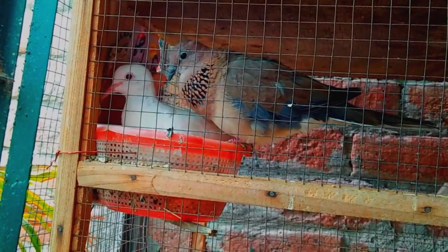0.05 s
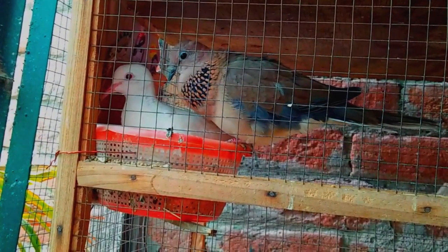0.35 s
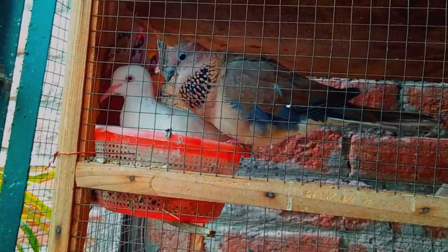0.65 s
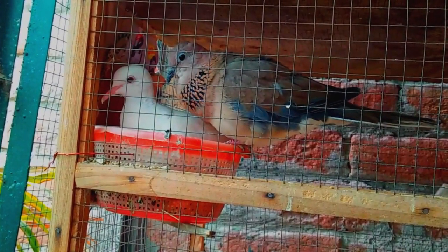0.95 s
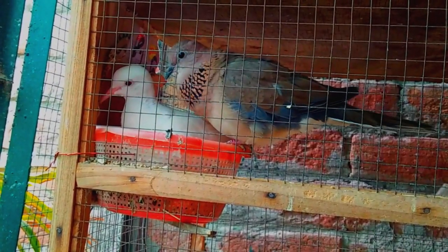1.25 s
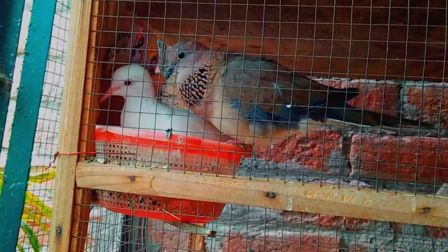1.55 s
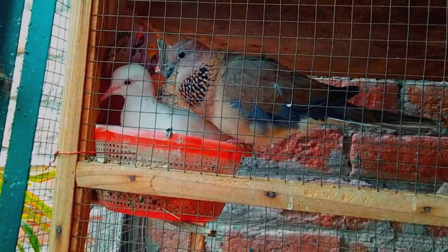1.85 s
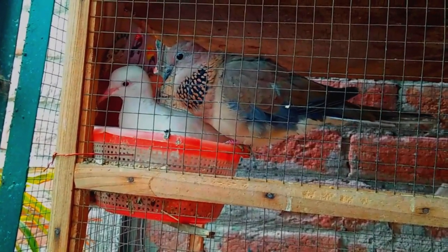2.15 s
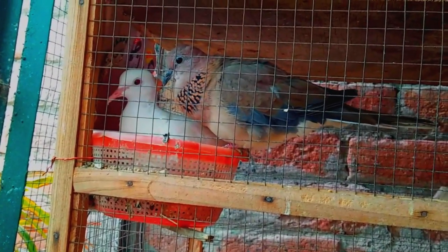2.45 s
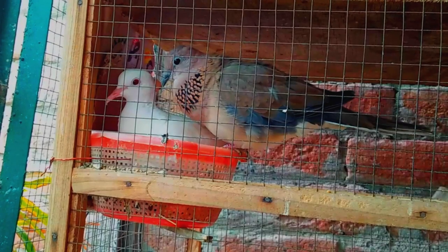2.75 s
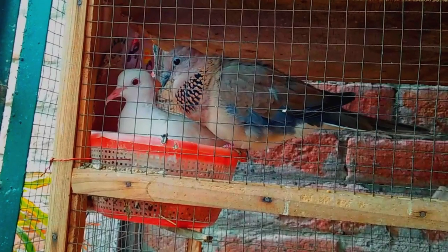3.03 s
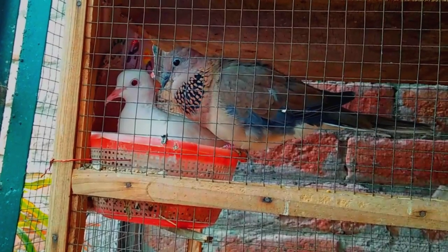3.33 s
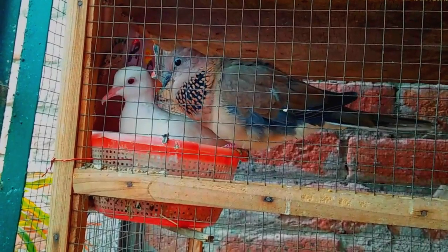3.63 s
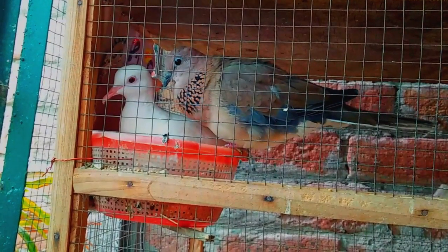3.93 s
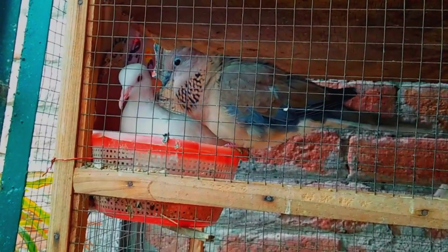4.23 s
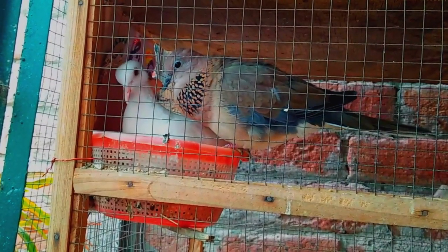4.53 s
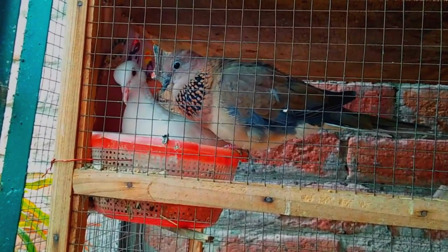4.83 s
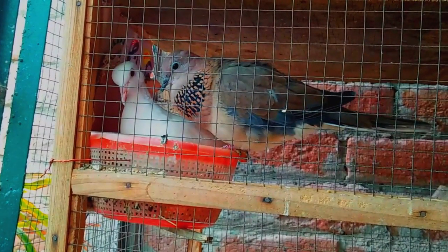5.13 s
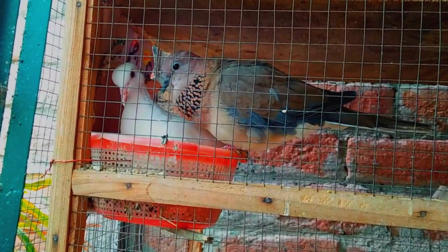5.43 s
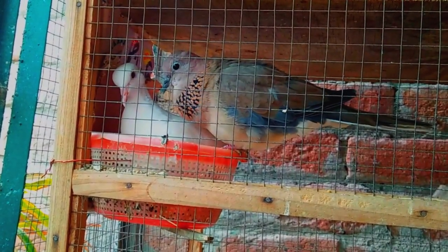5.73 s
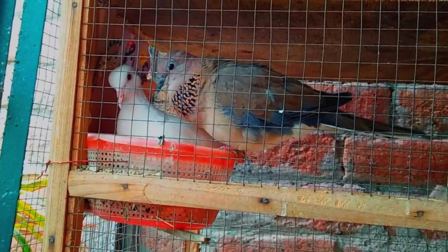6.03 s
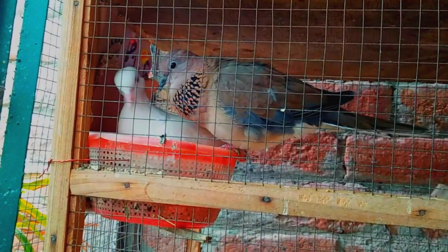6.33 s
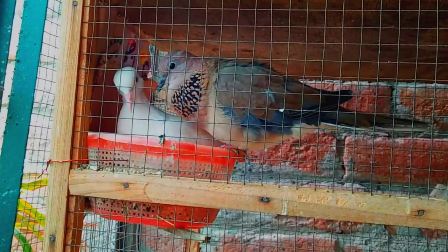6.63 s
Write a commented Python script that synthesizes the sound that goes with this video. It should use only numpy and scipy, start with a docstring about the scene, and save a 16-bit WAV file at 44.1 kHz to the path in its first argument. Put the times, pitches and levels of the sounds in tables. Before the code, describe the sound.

A dove coos close by about every second and a half, its mellow hoots mostly sinking into a little sigh, with quiet chuckles from another dove. Sharp, raspy parrot squawks cut in over continuous distant chirping, and a cluster of small wire mesh ticks comes toward the end. Wood and brick lightly reflect the calls in the aviary, with faint outdoor noise underneath.

```python
"""Over outdoor rumble and thin hiss, a dove in a wooden nest box grunts and starts the first of five
phrases: a murmur, then hooting coos, its swollen throat passing little but the fundamental. Far parrots
twitter, claws tick on wire mesh, and a near parrot's syrinx whistles and rasps. The phrase sinks to a
sigh and a second dove chuckles back. The screeches are loudest near 2 s and 4 s, the ticks near 6 s.
Throughout, the boards and bricks of the aviary reflect the calls."""
import sys
import numpy as np
from scipy import signal
from scipy.fft import rfft, irfft, next_fast_len
from scipy.io import wavfile
from scipy.ndimage import uniform_filter1d, minimum_filter1d

SR = 44100
rng = np.random.default_rng(int(sys.argv[2]) if len(sys.argv) > 2 else 0)


def inscribe(sig):
    """Save sig as 16-bit PCM at rate SR to the path in sys.argv[1].

    A 1-D sig is mono; a 2-D sig holds one channel per row.
    Samples are clipped to [-1, 1] before scaling.
    """
    pcm = np.round(np.clip(np.atleast_2d(sig).T, -1, 1) * 32767)
    wavfile.write(sys.argv[1], SR, pcm.astype(np.int16))


N = 298548
TIME = np.arange(N) / SR

# Levels are relative, ahead of the mix.
# Spectrum of the outdoor rumble: f/Hz, level/dB
RUMBLE_SPECTRUM = [(20, -21), (32, -23), (45, 5.5), (70, 0.5), (120, -5), (200, -13), (330, -22),
                   (700, -31.5), (2000, -86)]
# Spectrum of the hiss: f/Hz, level/dB
HISS_SPECTRUM = [(200, -5), (350, -8), (600, 2), (1000, 4), (1500, -5), (2500, 11), (3300, -5.5),
                 (4000, -13), (5500, -1), (7000, 4), (8500, -5.5), (11000, -3), (14500, -10)]
# Envelope of the hiss: t/s, level/dB
HISS_SWELL = [(0, -59), (.12, -72), (.2, -50.5), (.7, -63), (1.3, -46.5), (2.2, -52), (2.9, -55),
              (3.3, -56), (4.1, -44.5), (4.3, -64), (4.5, -48.5), (4.8, -57), (5.3, -55.5), (6.2, -45.5),
              (6.4, -56), (6.7, -54.5)]
# Throaty dove notes: t/s, duration/s, top f/Hz, level/dB
GRUNTS = [(0, 0.036, 412, -36), (0.655, 0.13, 479, -43.5), (0.874, 0.081, 483.7, -34.5),
          (1.341, 0.046, 420, -37.5), (1.658, 0.11, 519, -45), (2.81, 0.08, 415, -38),
          (4.348, 0.091, 411.3, -38), (5.809, 0.048, 472.6, -39), (5.98, 0.058, 402, -38)]
# Opening notes of the phrases: t/s, duration/s, level/dB
MURMURS = [(0.026, 0.15, -33.5), (1.547, 0.17, -30), (3.037, .15, -30.5), (4.559, 0.17, -28.5),
           (6.184, .16, -30.5)]
# Distant chirps: t/s, duration/s, start f/Hz, end f/Hz, level/dB
TWITTERS = [(0.145, 0.033, 2774, 2940, -39.5), (0.221, 0.04, 2633, 2325, -36),
            (0.276, 0.065, 2740, 2927, -39), (0.749, 0.061, 2290, 2097, -36.5),
            (.839, .13, 3190, 2154, -36), (.84, 0.061, 6560, 5680, -44), (0.918, 0.079, 4460, 4000, -44),
            (1.009, 0.13, 2680, 3220, -35), (1.204, 0.074, 2450, 5630, -34.5),
            (1.25, 0.066, 6260, 6000, -35.5), (1.272, 0.11, 2820, 3960, -35.5),
            (1.344, 0.079, 4710, 4940, -28), (1.445, .13, 2410, 3450, -36),
            (1.52, 0.094, 3450, 4540, -33.5), (1.656, 0.11, 3110, 2235, -33.5),
            (1.735, 0.063, 4970, 4970, -35.5), (1.737, 0.18, 2672, 2507, -37),
            (1.911, .064, 1843, 2587, -27), (2.789, 0.071, 2920, 2120, -37),
            (3.579, 0.099, 2920, 2960, -42.5), (3.718, 0.075, 2820, 2670, -31.5),
            (4.271, 0.043, 2764, 2610, -35), (4.72, 0.036, 2880, 2485, -44), (4.864, .12, 2700, 2880, -47),
            (5.061, 0.11, 2958, 2493, -43), (5.223, 0.077, 3540, 3270, -46.5),
            (5.828, 0.11, 2636, 2760, -36), (6.155, 0.048, 2375, 2405, -35),
            (6.508, 0.094, 2603, 2183, -36)]
# Claws and beaks touching the mesh: t/s, level/dB
TICKS = [(.2024, -20), (.2242, -30.5), (3.157, -24), (3.535, -27.5), (4.6204, -20), (5.1374, -25.5),
         (5.2109, -25.5), (6.0987, -24), (6.1363, -18), (6.204, -13.5), (6.2497, -22), (6.3005, -25),
         (6.621, -27), (6.6743, -29)]
# Spectrum of the wire mesh: f/Hz, level/dB
MESH_SPECTRUM = [(1000, -14.5), (2500, -1.5), (4000, -9.5), (6500, 6), (9000, -0.5), (14000, -4)]
# Full coos: t/s, low lead/s, high hold/s, low tail/s, top f/Hz, level/dB
COOS = [(.28, 0.014, 0.092, 0.017, 750, -20.5), (.461, 0.0018, 0.037, .012, 761, -20),
        (.555, 0.0063, 0.043, .02, 774, -20.5), (1.808, 0.015, 0.046, 0.003, 740, -22),
        (1.896, 0.0048, .053, 0.011, 756.6, -20.5), (2.035, 0.0023, .046, 0.029, 765, -20),
        (3.292, 0.012, 0.077, 0.0063, 749.5, -21), (3.385, 0.027, 0.032, 0.014, 759, -20.5),
        (3.517, 0.0062, .055, 0.023, 763.6, -21), (4.818, 0.047, 0.057, 0.027, 751.6, -19.5),
        (5.064, 0.0059, 0.042, 0.022, 781, -20), (6.428, 0.083, 0.06, 0.012, 761.6, -20),
        (6.648, 0.0029, 0.041, 0.026, 765, -19.5)]
# Near parrot calls: t/s, duration/s, peak position/1, start f/Hz, end f/Hz, glide position/1,
# glide time/s, start roughness/1, end roughness/1, mid-band level/dB, bass/dB re mid, treble/dB re mid
SQUAWKS = [(0.394, 0.12, 0.72, 2188, 2702, 0.66, 0.014, 0, 0.33, -18, -11, -14),
           (1.953, 0.1, 0.89, 3220, 2966, 0.27, .008, .12, 0.72, -18.5, -4.5, -12.5),
           (2.112, .084, 0.6, 3478, 1768, .61, .0065, 0.08, 0.17, -12, 3, -4.5),
           (2.29, 0.097, 0.53, 2180, 2860, 0.56, 0.01, 0.06, 0.18, -22, -5, -16.5),
           (2.509, 0.22, 0.26, 2213, 2285, 0.53, 0.034, 0.14, 0, -29.5, -33, -11.5),
           (3.246, 0.064, 0.9, 2375, 2096, 0.16, 0.0074, 0.57, 0.45, -20.5, -14, -13),
           (3.373, 0.076, 0.73, 2478, 2620, 0.59, 0.011, 0.54, 0.22, -19.5, -10, -13.5),
           (3.763, 0.092, 0.72, 2750, 2850, 0.38, 0.014, 0.83, 0.17, -28, -3.5, -16),
           (3.882, 0.27, 0.62, 2093, 3408, .26, .036, 0.75, 0.71, -12.5, -0.5, -9.5),
           (4.376, .097, 0.48, 1880, 3454, 0.41, 0.0097, 0.3, 0.88, -28, -6, -12.5),
           (5.28, 0.085, 0.37, 2930, 3223, 0.02, 0.013, 0.55, 0.48, -20, -9, -12.5),
           (5.404, .08, 0.23, 2917, 2602, 0.61, 0.016, 0.68, 0.78, -23.5, -5, -15),
           (5.615, 0.099, .52, 2165, 3048, 0.47, 0.00412, 0.14, 0.42, -17, -9.5, -13.5)]
# Response of a wide-open beak: f/Hz, gain/dB
BEAK_RESPONSE = [(410, -75.5), (700, -28.5), (1120, -27), (1790, -6), (2460, 13), (2650, 6.5), (3420, 7),
                 (4400, -1.5), (4870, 1), (6780, -1), (8620, -3.5), (9660, -6), (11000, -19),
                 (14000, -13.5), (14500, -71)]
# Closing notes of the phrases: t/s, duration/s, start f/Hz, level/dB
SIGHS = [(0.663, 0.11, 640, -27), (2.153, 0.089, 632, -27.5), (3.64, .08, 634.4, -24.5),
         (5.188, 0.1095, 649, -23.5)]
# The second dove's answers: t/s, level/dB, hum duration/s
CHUCKLES = [(1.105, -31.5, 0.084), (1.295, -32, 0.075), (1.44, -33.5, 0.0035), (1.525, -35.5, 0.014),
            (1.595, -34, 0.0096), (1.735, -32.5, 0.0049), (3.02, -34, 0.0063), (4.54, -37, 0.011),
            (5.11, -29, 0.013), (5.235, -29.5, 0.0028), (5.373, -32, 0.074), (5.494, -32, 0.068),
            (5.613, -34, 0.072), (5.736, -36.5, 0.017)]
# Dull bumps in the rumble: t/s, duration/s, level/dB
BUMPS = [(2.1, 0.13, -52), (3.393, 0.05, -55), (3.535, 0.11, -59), (4.578, 0.079, -53),
         (5.132, 0.26, -54.5)]
# Reflections from the boards and bricks round the nest: delay/s, gain/dB
NEST_REFLECTIONS = [(.0052, -29.5), (.0141, -19), (.0275, -24)]
# Reverberation time of the aviary: f/Hz, T60/s
AVIARY_T60 = [(400, 0.78), (750, 0.39), (2500, 0.23), (6000, 0.18), (13000, 0.16)]


def amp(db):
    """Amplitude grows tenfold per 20 dB."""
    return 10 ** (np.asarray(db) / 20)


def unit(x):
    """Normalisation to unit RMS."""
    return x / np.sqrt(np.mean(x ** 2) + 1e-20)


def curve_at(points, hz):
    """Interpolation on a logarithmic frequency axis."""
    f, value = np.transpose(points)
    return np.interp(np.log(hz + 1), np.log(f + 1), value)


def add(mix, s, sound):
    """Superposition: a sound joins the mix at s seconds."""
    part = mix[max(round(s * SR), 0):][:len(sound)]
    part += sound[:len(part)]


def play(source, rows):
    """Superposition of one event per row."""
    out = np.zeros(N)
    for row in rows:
        add(out, *source(*row))
    return out


def colour(x, spectrum):
    """Filtering as multiplication of spectra."""
    size = next_fast_len(len(x) + 1024)
    gain = amp(curve_at(spectrum, np.fft.rfftfreq(size, 1 / SR)))
    return irfft(rfft(x, size) * gain, size)[:len(x)]


def band(x, hz, kind, order=4):
    """Butterworth filtering."""
    return signal.sosfilt(signal.butter(order, hz, kind, fs=SR, output="sos"), x)


def wobble(size, hz):
    """Low-passed noise as a random modulator."""
    return unit(band(rng.standard_normal(size + 2000), hz, "low", order=2)[-size:])


def phase_of(hz):
    """Phase is the integral of frequency."""
    return 2 * np.pi * np.cumsum(hz) / SR


def gate(t, attack, release):
    """Raised-cosine ramps open and close a note."""
    return np.sin(np.pi / 2 * np.clip(np.minimum(t / attack, (t[-1] - t) / release), 0, 1)) ** 2


def rumble(level_db=-64, lumps_db=2):
    """Random amplitude modulation makes deep outdoor noise lumpy."""
    noise = unit(colour(rng.standard_normal(N), RUMBLE_SPECTRUM))
    return amp(level_db + lumps_db * wobble(N, 35)) * noise


def hiss(flicker_db=2):
    """Amplitude modulation makes thin noise swell and flicker."""
    swell_db = np.interp(TIME, *np.transpose(HISS_SWELL)) + flicker_db * wobble(N, 26)
    return amp(swell_db) * unit(colour(rng.standard_normal(N), HISS_SPECTRUM))


def grunt(s, length, pitch_hz, level_db, harmonics_db=(-13, 0, -21)):
    """Resonance: the dove's throat favours the second harmonic of a low, arched note."""
    u = np.linspace(0, 1, round(length * SR))
    phase = phase_of(pitch_hz * (1 - .35 * (u - .5) ** 2 + .015 * wobble(len(u), 200)))
    tone = sum(amp(db) * np.sin(k * phase) for k, db in enumerate(harmonics_db, 1))
    flutter = np.exp(0.43 * wobble(len(u), 110))
    return s, amp(level_db) * unit(tone * flutter) * signal.windows.tukey(len(u), .35)


def throat(hz, level_db, attack=0.014, husky_hz=650, jitter=0.0082, shimmer=0.057, waver_db=1.05):
    """Source and filter: the swollen throat passes mainly the fundamental; low notes are huskier."""
    t = np.arange(len(hz)) / SR
    phase = phase_of(hz * (1 + jitter * wobble(len(t), 55)))
    husky = np.clip((husky_hz - hz) / 50, .05, 1) * amp(-26)
    overtones = sum(np.sin(k * phase) * (1 + .5 * wobble(len(t), 60)) for k in (1.5, 2, 3)) / 2
    tone = unit(np.sin(phase) + husky * overtones) * (1 + shimmer * wobble(len(t), 62))
    # the voice cracks at onsets and register breaks
    slew_hz_per_s = uniform_filter1d(abs(np.gradient(hz, t)), size=300)
    cracking = np.clip(slew_hz_per_s / 8000, 0, 1) ** 2 + np.exp(-t / 0.011)
    crack = amp(-17) * cracking * unit(band(rng.standard_normal(len(t)), [450, 1000], "band", order=3))
    envelope = amp(level_db + waver_db * wobble(len(t), 25)) * gate(t, attack, release=0.0057)
    return envelope * (tone + crack)


def murmur(s, length, level_db, start_hz=569, rise_hz=61.6, purr_hz=145, purr_depth=0.019, purr_db=1.73):
    """Joint frequency and amplitude modulation puts a purr on a swelling, rising note."""
    u = np.linspace(0, 1, round(length * SR))
    pulse = np.sin(phase_of(purr_hz * (1 + 0.068 * wobble(len(u), 44))))
    hz = (start_hz + rise_hz * u ** 2) * (1 + purr_depth * pulse)
    swell_db = np.interp(u, [0, 0.74, 1], [-9, 0, -4.5])
    return s, throat(hz, level_db + purr_db * pulse + swell_db)


def twitter(s, length, start_hz, end_hz, level_db, scratch=0.059, waver=0.0291, flutter=0.38):
    """Random frequency modulation of a far chirp: the fast part scratches, the slow part wavers."""
    size = round(length * SR)
    unsteady = scratch * rng.uniform(0.75, 1.636) * wobble(size, 675) + waver * wobble(size, 51.3)
    phase = phase_of(np.linspace(start_hz, end_hz, size) * (1 + unsteady))
    tone = (np.sin(phase) + amp(-24) * np.sin(2 * phase)) * np.exp(flutter * wobble(size, 80))
    return s, amp(level_db) * unit(tone) * signal.windows.tukey(size, .5)


def chatter(count=120):
    """Superposition of the flock's faint random chirps gives a running warble."""
    out = np.zeros(N)
    for k, (late, length, pitch, glide, soft) in enumerate(rng.random((count, 5))):
        s = (k + late) / count * TIME[-1]
        hz = 1400 + 1600 * pitch
        level_db = -42.5 - 9 * soft - 4 * (1 - pitch)
        add(out, *twitter(s, .02 + .05 * length, hz, hz * (.8 + .4 * glide), level_db, scratch=0.024))
    return out


def mesh_ticks(rise_s=0.0015, decay_s=0.012, gain_db=-11, scratch_count=45):
    """Damped vibration: each touch rattles the wire briefly; faint scratches fall in between."""
    out, t = np.zeros(N), np.arange(3000) / SR
    envelope = np.exp(-t / decay_s) * (1 - np.exp(-t / rise_s))
    scratches = [(when * TIME[-1], -35 - 10 * soft) for when, soft in rng.random((scratch_count, 2))]
    for s, level_db in list(TICKS) + scratches:
        rattle = unit(colour(rng.standard_normal(len(t)), MESH_SPECTRUM))
        add(out, s, amp(level_db + gain_db) * rattle * envelope)
    return out


def coo(s, lead, hold, tail, pitch_hz, level_db, break_s=0.0046, arch_db=7, hz_per_db=3, low_db=-6):
    """Register break: the voice jumps to a loud hoot, where pitch follows effort, then drops back."""
    t = np.arange(0, lead + hold + tail, 1 / SR)
    high = (np.tanh((t - lead) / break_s) - np.tanh((t - lead - hold) / break_s)) / 2
    effort_db = -arch_db * np.clip(2 * (t - lead) / hold - 1, -1, 1) ** 2
    low_hz = np.where(t < lead + hold / 2, 665, 631)
    hz = high * (pitch_hz + hz_per_db * effort_db) + (1 - high) * low_hz
    return s, throat(hz, level_db + high * effort_db + (1 - high) * low_db, attack=0.0095)


def syrinx(pitch_hz, rough, buzz_hz=330, buzz_depth=0.53, twin_ratio=1.072, twin_db=-17, smear_hz=440):
    """Nonlinear oscillation: returns a buzzing whistle and the rasp of its period doubling."""
    size = len(pitch_hz)
    shake = np.sin(phase_of(buzz_hz * (1 + 0.322 * wobble(size, 119.5))))
    jitter = (0.013 + .06 * rough) * (wobble(size, 600) + 0.66 * shake)
    phase = phase_of(pitch_hz * (1 + jitter + 0.0069 * wobble(size, 70)))
    twin = phase * twin_ratio  # the other side of the syrinx sings a little sharp
    odd = np.clip((pitch_hz - 2500) / 600, .08, 1)  # even harmonics carry the low calls
    whistle = sum(odd ** (k % 2) * (np.sin(k * phase) + amp(twin_db) * np.sin(k * twin))
                  for k in range(1, 7))
    rasp = 0
    for k in range(1, 11):  # a noise band round each half harmonic
        sine = wobble(size, smear_hz) * np.sin(k * phase / 2)
        cosine = wobble(size, smear_hz) * np.cos(k * phase / 2)
        rasp += 0.65 ** (k % 2) * (sine + cosine)
    croak = np.clip((3200 - pitch_hz) / 150, 0, 3.5) * rough  # the subharmonic swells as pitch sinks
    rasp += 2 * croak * wobble(size, 200) * np.sin(phase / 2)
    return whistle * (1 + buzz_depth * shake), rasp * np.exp(0.29 * wobble(size, 303))


def squawk(s, length, peak_at, start_hz, end_hz, glide_at, glide_s, rough_start, rough_end,
           level_db, bass_db, treble_db, attack_s=.018):
    """Source and filter: a parrot's syrinx slides between two pitches and its beak colours the sound."""
    t = np.arange(-attack_s / 2, length, 1 / SR)
    u = t / length
    pitch_hz = start_hz + (end_hz - start_hz) / (1 + np.exp((glide_at * length - t) / glide_s))
    rough = np.clip(rough_start + (rough_end - rough_start) * u, 0, 1)
    whistle, rasp = (unit(colour(x, BEAK_RESPONSE)) for x in syrinx(pitch_hz, rough))
    voice = np.sqrt(1 - rough) * whistle + np.sqrt(rough) * rasp
    swell_db = np.interp(u, [0, peak_at, 1], [-5.5, 0, -5])
    attack_db = 14.5 * np.minimum(t / attack_s - .5, 0)
    low_db = bass_db + 22.5 * (rough - rough.mean())  # rasp brings out the bass
    top_db = treble_db + .4 * (swell_db - swell_db.mean())  # effort brings out the treble
    out = 0
    for edges_hz, kind, db in ((3700, "low", low_db), ([3700, 8000], "band", 0), (8000, "high", top_db)):
        part = band(voice, edges_hz, kind, order=6)
        running_rms = np.sqrt(uniform_filter1d(part ** 2, size=900) + 1e-9)
        out += amp(db) * part / running_rms
    envelope = amp(level_db + swell_db + attack_db) * gate(t - t[0], attack_s / 2, release=0.01)
    return s + t[0], out * envelope


def sigh(s, length, pitch_hz, level_db, sag_hz_per_s=726, fade_db=15):
    """Exponential decay: the dove's closing note dies away as its pitch sinks."""
    t = np.arange(0, length, 1 / SR)
    return s, throat(pitch_hz - sag_hz_per_s * t, level_db - fade_db * t / length)


def chuckle(s, level_db, hum_s, yelp_s=0.015, yelp_hz=930, hum_hz=670, jitter=0.055, flutter=0.072):
    """Register break: a hoarse instant of yelp drops to a low, sinking hum."""
    t = np.arange(0, yelp_s + hum_s, 1 / SR)
    hz = np.where(t < yelp_s, yelp_hz * rng.uniform(0.86, 1.06), hum_hz * (1.04 - 0.1165 * t / t[-1]))
    unsteady = 1 + jitter * np.where(t < yelp_s, 1, .4) * wobble(len(t), 158.4)
    corners_s = [0, yelp_s / 3, yelp_s * 2 / 3, yelp_s, yelp_s + hum_s / 4, yelp_s + hum_s]
    envelope = np.interp(t, corners_s, [0, 1, 1, .25, amp(-4), .2]) * signal.windows.tukey(len(t), .1)
    tone = unit(np.sin(phase_of(hz * unsteady)) * np.exp(flutter * wobble(len(t), 100)))
    return s, amp(level_db) * envelope * tone


def bump(s, length, level_db):
    """Windowing deep noise gives a soft, dull swell."""
    size = round(length * SR)
    noise = unit(colour(rng.standard_normal(size), RUMBLE_SPECTRUM))
    return s, amp(level_db) * noise * signal.windows.tukey(size, .6)


def nest(x):
    """Early reflection: the nearest surfaces add a quick flutter to the direct sound."""
    out = x.copy()
    for delay, db in NEST_REFLECTIONS:
        add(out, delay, amp(db) * x)
    return out


def aviary(x, delay=.004, reflections_per_s=3000):
    """Reverberation: dense reflections decay exponentially, each band at its own rate."""
    size = SR // 2
    taps = rng.standard_normal(size) * (rng.random(size) < reflections_per_s / SR) * (TIME[:size] > delay)
    hz, t, spectra = signal.stft(taps, SR, nperseg=256)
    decay = amp(-60 * t / curve_at(AVIARY_T60, hz)[:, None])
    tail = signal.istft(spectra * decay, SR, nperseg=256)[1]
    return signal.fftconvolve(x, tail / np.linalg.norm(tail))[:N]


def scene():
    """Superposition of direct sound, reverberation and background in mid-side stereo."""
    doves = play(grunt, GRUNTS) + play(murmur, MURMURS) + play(coo, COOS)
    doves += play(sigh, SIGHS) + play(chuckle, CHUCKLES)
    far = chatter() + play(twitter, TWITTERS)
    near = mesh_ticks() + play(squawk, SQUAWKS)
    reverberation = aviary(amp(-16) * doves + amp(-6) * near + amp(-5) * far)
    background = rumble() + hiss() + play(bump, BUMPS)
    mid = nest(doves) + amp(-2) * (near + far) + reverberation + background
    # only the treble of the reflections and the hiss differs between the ears
    diffuse = amp(-8) * aviary(near + far, delay=0) + amp(-20) * hiss()
    side = band(diffuse, 6800, "high", order=6)
    return np.array([mid + side, mid - side])


def record(dry, ceiling_db=-2, limiter_s=0.0021, cutoff_hz=14450):
    """Peak limiting holds down the loudest squawks; a low-pass filter then limits the bandwidth."""
    size = round(limiter_s * SR)
    allowed_gain = np.minimum(amp(ceiling_db) / (abs(dry).max(0) + 1e-9), 1)
    limited = dry * uniform_filter1d(minimum_filter1d(allowed_gain, size), size)
    lowpass = signal.firwin(511, cutoff_hz, window=("kaiser", 9), fs=SR)
    return signal.oaconvolve(limited, lowpass[None], "same")


dry = scene()
out = record(dry)
inscribe(out)
```